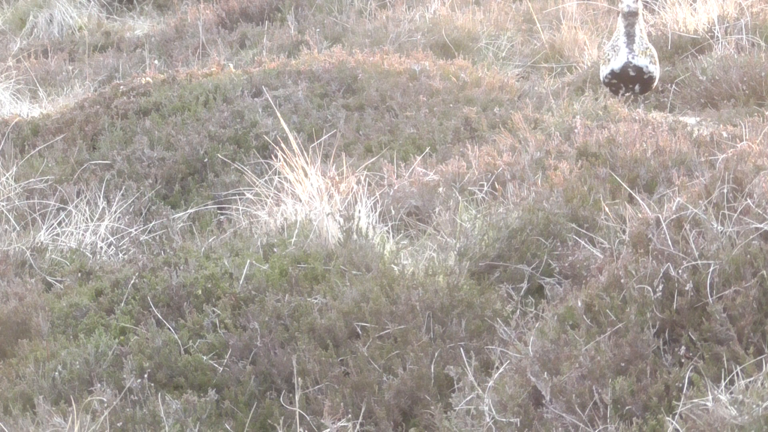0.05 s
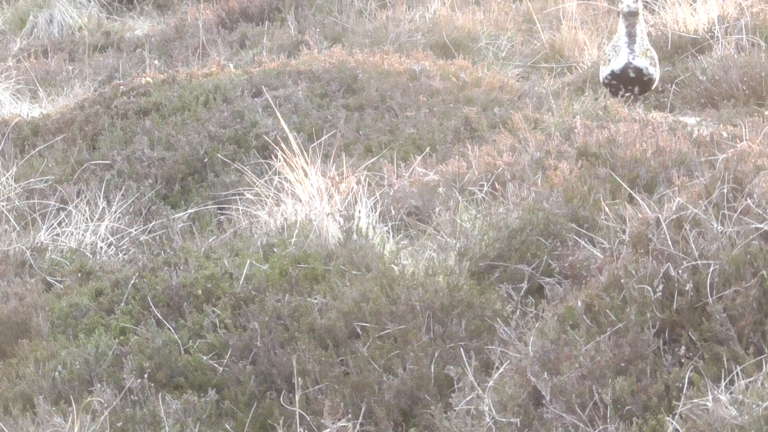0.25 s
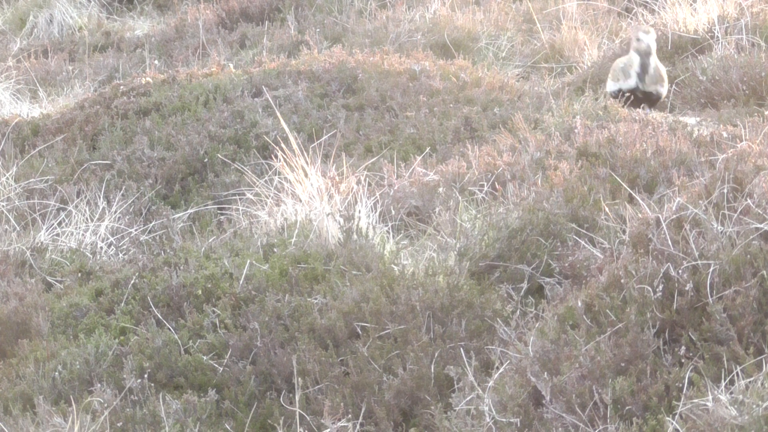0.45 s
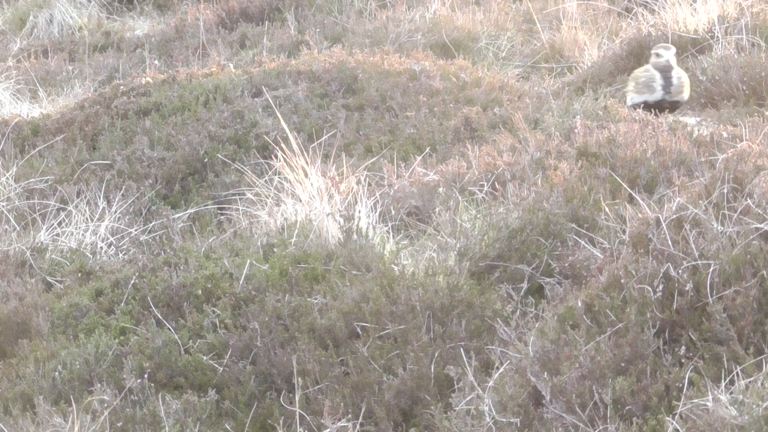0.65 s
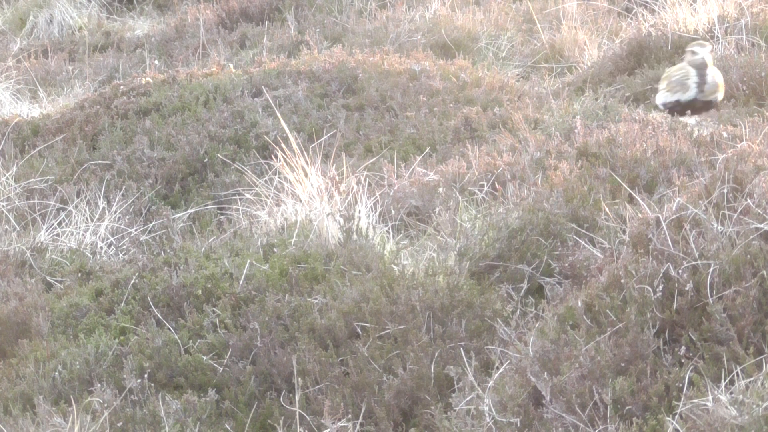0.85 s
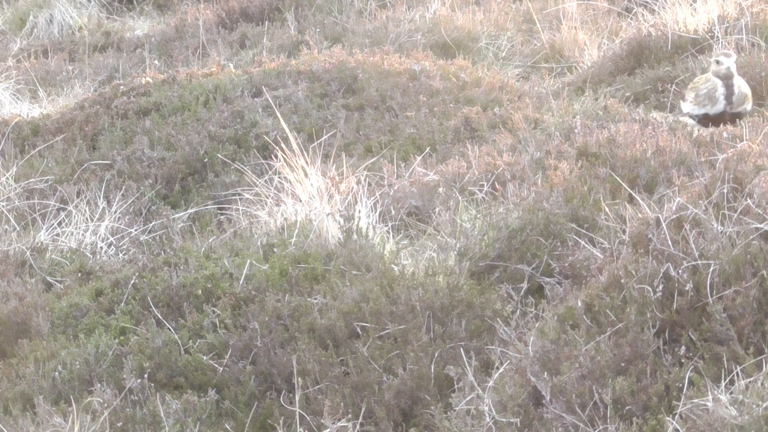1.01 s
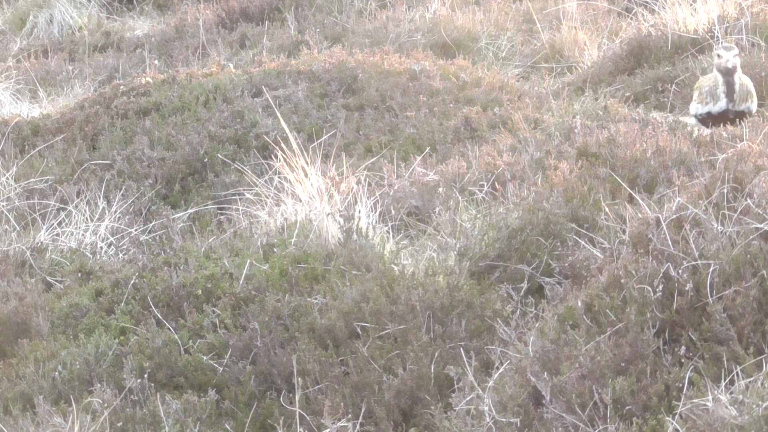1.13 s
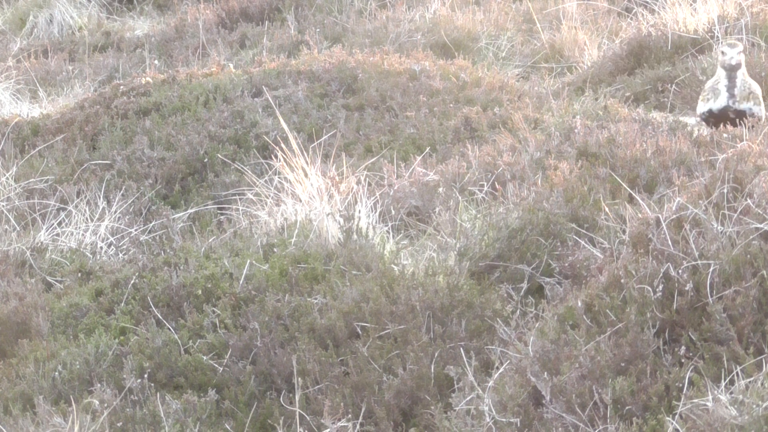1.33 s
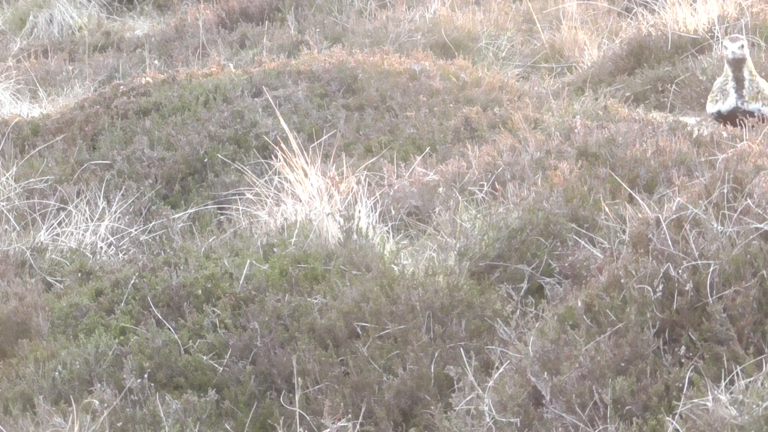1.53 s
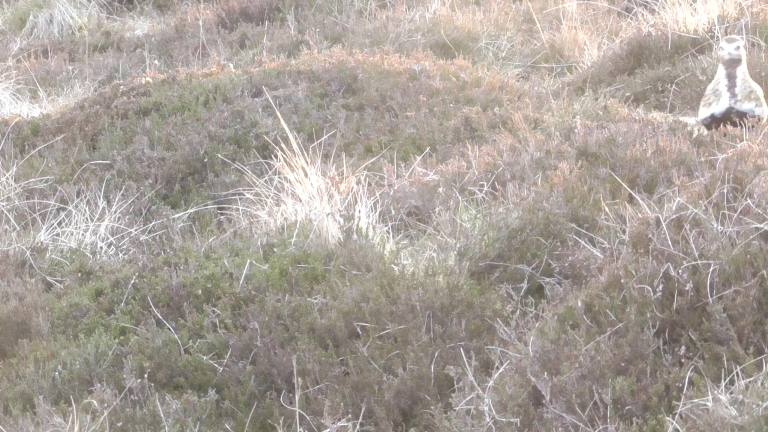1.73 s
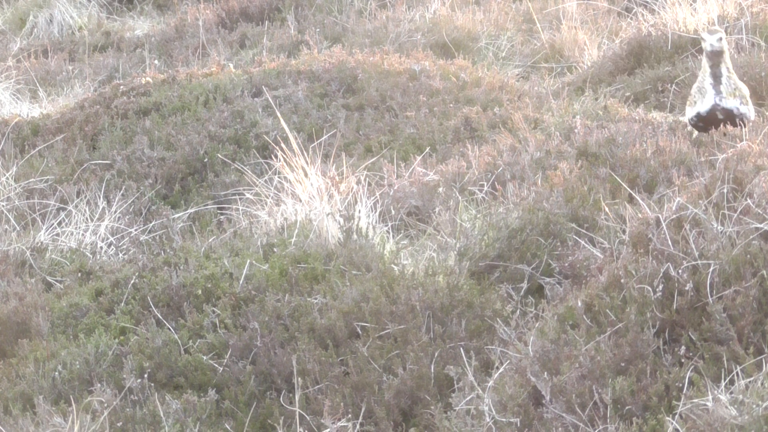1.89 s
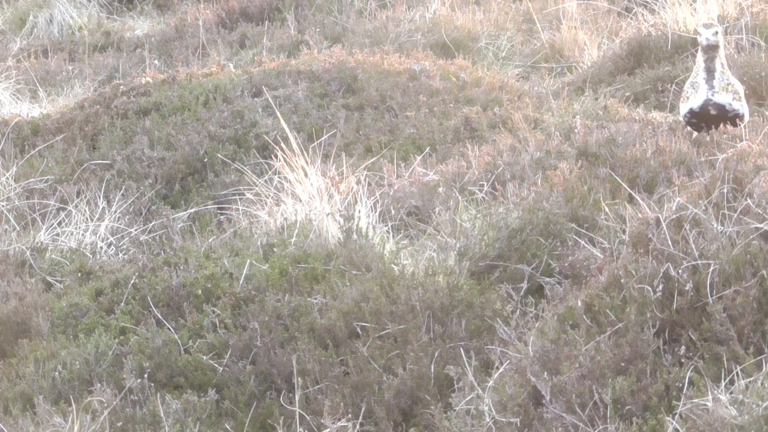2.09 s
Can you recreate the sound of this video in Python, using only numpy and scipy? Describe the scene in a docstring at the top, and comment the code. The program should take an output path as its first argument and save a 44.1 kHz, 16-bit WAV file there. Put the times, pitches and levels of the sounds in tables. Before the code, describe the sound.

Close gusts of wind thump and rumble against the microphone for a second, then ease. In the quiet of the open moor, one far bird gives brief low notes and another whistles faintly twice over steady hiss.

```python
"""Open moorland, with gusts crossing a camera's microphone. Each gust sheds eddies at the ports: a lumpy
low throb whose pitch follows the air speed, over a slow rumble, with turbulent flutter and a bright rip
in the hardest blows, mostly opposite in phase in the two channels. As the wind drops, one far bird gives
a few short low notes and another two plaintive whistles, over a bed of distant air and steady hiss."""
import sys
import numpy as np
from scipy import signal
from scipy.fft import rfft, irfft
from scipy.io import wavfile
from scipy.ndimage import uniform_filter1d

SR = 44100
rng = np.random.default_rng(int(sys.argv[2]) if len(sys.argv) > 2 else 0)


def log_audio(samples):
    """Write samples as a 16-bit WAV file to the path given in sys.argv[1]."""
    # one column per channel
    frames = np.atleast_2d(samples).T
    # limit to full scale, then quantise
    limited = np.clip(frames, -1, 1)
    pcm = np.round(limited * 32767).astype(np.int16)
    wavfile.write(sys.argv[1], SR, pcm)


N = 94815
TIME = np.arange(N) / SR
BIN_HZ = np.arange(N // 2 + 1) * SR / N + 1   # 1 Hz up keeps the log finite
ANTIPHASE = np.array([[1], [-1]])


def from_db(db):
    """Decibels to gain."""
    return 10 ** (np.asarray(db) / 20)


def unit_rms(x):
    """Scale to rms 1."""
    return x / np.sqrt(np.mean(x ** 2) + 1e-20)


def automation(rows):
    """Each column of a breakpoint curve at every sample."""
    times, *columns = np.transpose(rows)
    return [np.interp(TIME, times, column) for column in columns]


def at_bins(points):
    """A curve over log frequency, read at every spectral bin."""
    hz, value = np.transpose(points)
    return np.interp(np.log(BIN_HZ), np.log(hz), value)


def drift(rate_hz):
    """A smooth random modulator of rms about 1, drawn every 40 samples."""
    pole = np.exp(-2 * np.pi * rate_hz * 40 / SR)
    slow = signal.lfilter([1], [1, -2 * pole, pole * pole], rng.standard_normal(N // 40 + 2002))[2000:]
    return np.interp(np.arange(N) / 40, np.arange(len(slow)), unit_rms(slow))


def noise(eq, weight=1):
    """Noise shaped by an EQ curve, rolling off steeply beyond its ends."""
    skirts = np.minimum(1, np.minimum(BIN_HZ / eq[0][0], eq[-1][0] / BIN_HZ)) ** 4
    colour = unit_rms(from_db(at_bins(eq)) * skirts)
    return irfft(rfft(rng.standard_normal(N)) * colour * weight, N)


def stereo_noise(eq, correlation):
    """Mid and side noise, balanced for the given left-right correlation."""
    alike = np.clip(at_bins(correlation), -1, 1)
    mid = noise(eq, np.sqrt((1 + alike) / 2))
    side = noise(eq, np.sqrt((1 - alike) / 2))
    return mid + side * ANTIPHASE


def turbulence(eq, window_samples, own_share=0):
    """Levelled antiphase noise for a gust to ride, plus any share each port has to itself."""
    raw = noise(eq)
    levelled = raw / np.sqrt(uniform_filter1d(raw ** 2, window_samples) + 1e-9)
    return levelled * ANTIPHASE + own_share * np.array([noise(eq), noise(eq)])


def pan(left_db):
    """Channel gains for a level of left relative to right."""
    return from_db([[left_db / 2], [-left_db / 2]])


def tone(hz, left_lead_rad):
    """A stereo sine of rms 1 on a pitch curve, with a phase offset between the channels."""
    phase = 2 * np.pi * np.cumsum(hz) / SR
    return np.sqrt(2) * np.sin(phase + np.array([[left_lead_rad], [0]]))


# EQ of the air bed: (frequency [Hz], relative level [dB])
AIR_EQ = [(20, -7), (60, -3), (130, 4), (220, 3.5), (420, -2.5), (800, -3.5), (1050, -7.5), (1250, -4.5),
          (1400, -12.5), (1520, -8), (1700, -19.5), (2300, -16.5), (2800, -32), (6000, -37)]
# its stereo image: (frequency [Hz], left-right correlation [-1..1])
AIR_IMAGE = [(60, -0.33), (120, -0.51), (240, -0.59), (480, -0.68), (950, -0.66), (1900, -0.14),
             (3800, 0.05)]


def distant_air():
    """Air moving far over the moor: a wide, dark bed that barely sways."""
    return from_db(-64 + 0.44 * drift(rate_hz=4.5)) * stereo_noise(AIR_EQ, AIR_IMAGE)


# EQ of the hiss: (frequency [Hz], relative level [dB])
HISS_EQ = [(1500, -13), (2800, -7), (3600, -4.5), (4800, -6), (6100, -10.5), (7100, -6), (8200, -1.5),
           (9700, 0), (12000, -1), (14500, -3), (15700, -6.5)]
# its stereo image: (frequency [Hz], left-right correlation [-1..1])
HISS_IMAGE = [(3000, 0.055), (7500, 0.16), (15000, .2)]


def microphone_hiss():
    """The microphone's steady, bright noise floor."""
    return from_db(-70) * stereo_noise(HISS_EQ, HISS_IMAGE)


# Wind automation, ahead of each layer's trim:
# (time [s], throb level [dB], eddy rate [Hz], flutter level [dB])
OPENING_CALM = [(0, -93, 130, -87)]
GUST_RUN = [(0.1, -91, 119.1, -87), (0.122, -49.5, 134.4, -64), (0.148, -68, 95.3, -83),
            (0.185, -43, 100, -71), (0.207, -28, 146, -50.5), (0.222, -35.5, 174, -60),
            (0.236, -44, 117, -64), (0.265, -59, 94, -84), (0.277, -30.5, 129, -49.5),
            (0.289, -27.5, 192, -44), (0.306, -43, 123.8, -58), (0.345, -33.5, 127, -48),
            (0.372, -40.5, 126.2, -56), (0.4, -29.5, 132.2, -42), (0.42, -31, 168.3, -48),
            (0.437, -23, 119.6, -46.5), (0.449, -32.5, 119.7, -50.5), (0.472, -21.5, 143.3, -27),
            (0.495, -35.5, 99, -45), (0.508, -42.5, 81.3, -69), (0.54, -55, 117.7, -82),
            (0.563, -37, 177.5, -36), (0.579, -29.5, 174, -35.5), (0.606, -37, 140.9, -73),
            (0.622, -39.5, 141.5, -44), (0.638, -21.5, 131, -37.5), (0.654, -44, 105.1, -50),
            (0.685, -40, 154.8, -63), (0.713, -45, 99.9, -71), (0.735, -36.5, 106.1, -71),
            (0.76, -42, 143.4, -56), (0.79, -56, 115.3, -65), (0.812, -43, 102.4, -76),
            (0.875, -55, 101.3, -69), (0.904, -32, 127.7, -55.5), (0.935, -43.5, 118.5, -53),
            (0.972, -46.5, 196, -57), (0.995, -47, 101.8, -61), (1.03, -42, 116.2, -60),
            (1.085, -49, 114.8, -63), (1.125, -61, 110.6, -67)]
LIGHT_AIR = [(1.17, -69, 120.3, -79), (1.285, -76, 129.4, -83), (1.305, -60, 114.1, -75),
             (1.37, -60.5, 128.3, -79), (1.40, -69, 129.4, -75), (1.43, -61, 141.8, -78),
             (1.48, -66, 130.4, -77), (1.541, -57.5, 127.8, -71), (1.579, -70, 125.8, -70),
             (1.625, -62, 122.6, -77), (1.656, -90, 121.8, -87), (1.801, -88, 131.9, -78),
             (1.96, -78, 149.6, -83), (2.15, -85, 154, -76)]


def wind():
    """Gusts at the ports push one channel as they pull the other, leaning to the right."""
    gust_db, eddy_hz, flutter_db = automation(OPENING_CALM + GUST_RUN + LIGHT_AIR)
    flutter_gain = from_db(flutter_db + 1 + 2.5 * drift(LUMP_RATE_HZ))
    low_end = eddy_throb(gust_db, eddy_hz) + rumble(gust_db)
    texture = flutter(flutter_gain) + rip(flutter_gain, flutter_db)
    return pan(left_db=-4.5) * (low_end + texture)


LUMP_RATE_HZ, EDDY_WANDER = 88.7, 0.0866


def eddy_throb(gust_db, eddy_hz):
    """Eddies shed at the ports: a low tone at the shedding rate, lumpy in pitch and level."""
    pitch_hz = eddy_hz * (1 + EDDY_WANDER * drift(LUMP_RATE_HZ))
    phase = 2 * np.pi * np.cumsum(pitch_hz) / SR
    gain = from_db(gust_db - 1 + 1.73 * drift(LUMP_RATE_HZ))
    return gain * unit_rms(np.sin(phase)) * ANTIPHASE


# EQ of the rumble: (frequency [Hz], relative level [dB])
RUMBLE_EQ = [(22, -17), (32, -8.5), (48, -8), (68, 4.5), (100, -5.5), (170, -15)]
REFERENCE_GUST_DB, RUMBLE_FOLLOW, RUMBLE_SMOOTH_S = -38, 0.58, 0.051


def rumble(gust_db):
    """A slow pressure swell that follows part of the gusts' smoothed swing."""
    swell_db = uniform_filter1d(gust_db, int(RUMBLE_SMOOTH_S * SR) + 1) - REFERENCE_GUST_DB
    gain = from_db(-52.5 + RUMBLE_FOLLOW * swell_db)
    return gain * turbulence(RUMBLE_EQ, window_samples=2200, own_share=0.41)


# EQ of the flutter: (frequency [Hz], relative level [dB])
FLUTTER_EQ = [(120, -20), (200, 5.5), (270, 5), (365, 1.5), (460, -8.5), (560, -11), (720, -29), (950, -35),
              (1400, -48)]


def flutter(gain):
    """Turbulent air at the ports flaps in the low mids."""
    return gain * turbulence(FLUTTER_EQ, window_samples=400, own_share=0.058)


# EQ of the rip: (frequency [Hz], relative level [dB])
RIP_EQ = [(280, -18), (380, 8), (550, -6.5), (750, -2.5), (1000, -25), (1500, -51)]
RIP_TRIM_DB, RIP_THRESHOLD_DB, RIP_KNEE_DB = -12, -55, 3.5


def rip(flutter_gain, flutter_db):
    """A bright edge on the flutter, let through a soft gate by the hardest blows."""
    gate = (1 + np.tanh((flutter_db - RIP_THRESHOLD_DB) / RIP_KNEE_DB)) / 2
    return flutter_gain * gate * from_db(RIP_TRIM_DB) * turbulence(RIP_EQ, window_samples=300)


# Cues for the low calls: (peak time [s], pitch [Hz], level [dB], glide [Hz/s])
CALL_CUES = [(1.196, 880, -72, -300), (1.355, 965, -65.5, 900), (1.537, 992, -68, 900),
             (1.703, 968, -71.5, -3000)]
CALL_HALF_WIDTH_S, CALL_ARCH, CALL_ROUGHNESS = 0.016, 0.04, 0.0243


def calling_bird():
    """Short far notes, each arching and gliding in pitch as it swells and fades."""
    calls = 0
    for peak_s, hz, db, glide in CALL_CUES:
        swell = np.exp(-((TIME - peak_s) / CALL_HALF_WIDTH_S) ** 2)
        bend = CALL_ARCH * (swell - 1) + CALL_ROUGHNESS * drift(rate_hz=120)
        pitch_hz = hz * (1 + bend) + glide * (TIME - peak_s)
        calls += from_db(db) * swell * tone(pitch_hz, left_lead_rad=0.81)
    return calls


# One breakpoint curve per whistle: (time [s], pitch [Hz], level before panning [dB])
WHISTLE_CURVES = [
    [(1.24, 2176, -93), (1.31, 2210, -84), (1.43, 2222, -81), (1.5, 2235, -83), (1.6, 2280, -82),
     (1.67, 2290, -97)],
    [(2.01, 2530, -90), (2.04, 2476, -87), (2.09, 2405, -92), (2.15, 2416, -86)],
]
WHISTLE_WAVER_DB = 1


def whistling_bird():
    """Thin, slowly gliding whistles, far off to the right and wavering in the wind."""
    whistles = 0
    for curve in WHISTLE_CURVES:
        hz, db = automation(curve)
        gate = (TIME > curve[0][0]) & (TIME < curve[-1][0])
        gain = from_db(db + WHISTLE_WAVER_DB * drift(rate_hz=14.6))
        whistles += gate * gain * tone(hz, left_lead_rad=-1.15)
    return pan(left_db=-4) * whistles


def scene():
    """The mix: a bed of air and hiss, wind up close, birds far behind."""
    return distant_air() + microphone_hiss() + wind() + calling_bird() + whistling_bird()


def record(dry):
    """A steep high cut at 15.7 kHz."""
    return signal.sosfilt(signal.ellip(12, 0.1, 70, 15700, fs=SR, output="sos"), dry)


dry = scene()
out = record(dry)
log_audio(out)
```